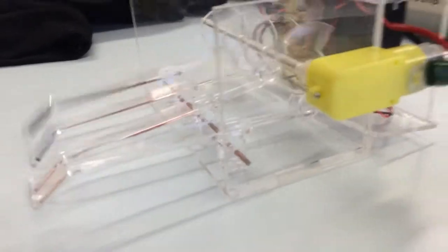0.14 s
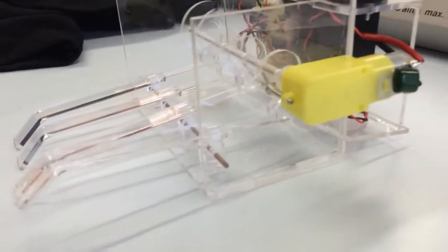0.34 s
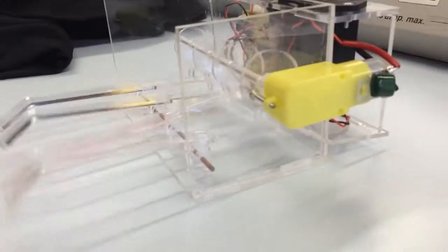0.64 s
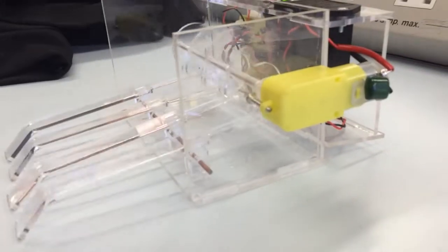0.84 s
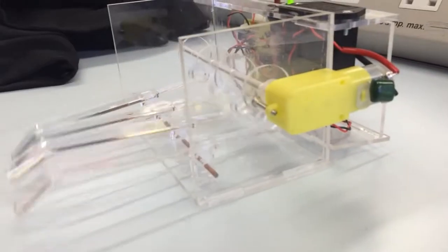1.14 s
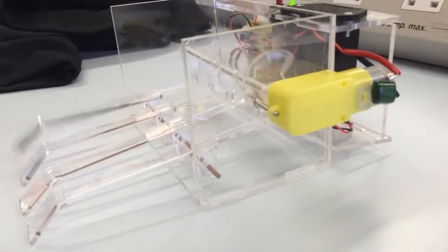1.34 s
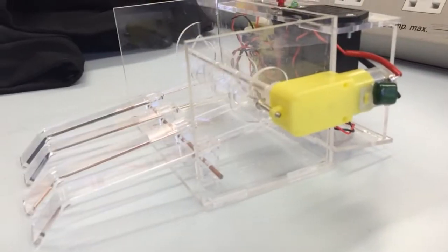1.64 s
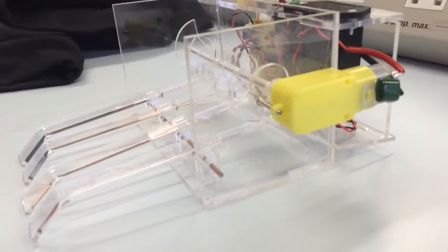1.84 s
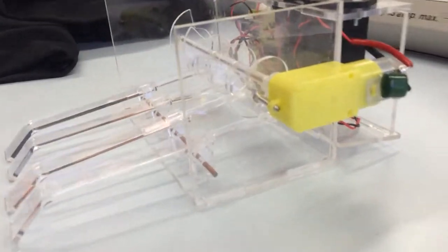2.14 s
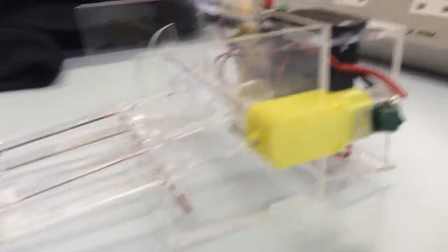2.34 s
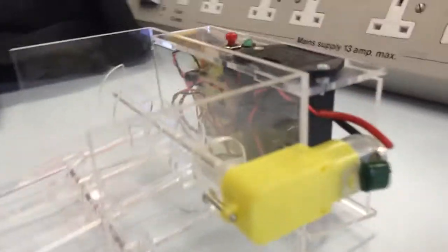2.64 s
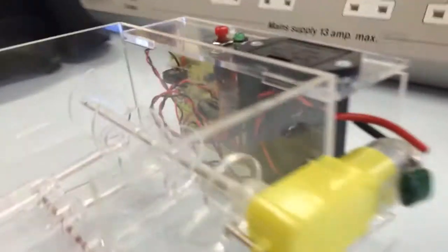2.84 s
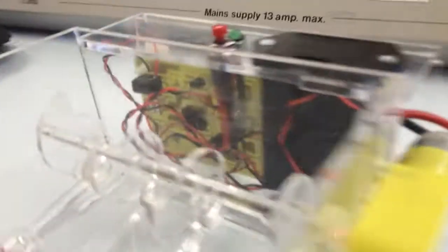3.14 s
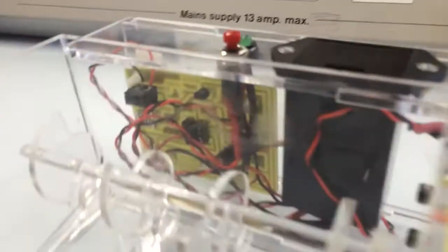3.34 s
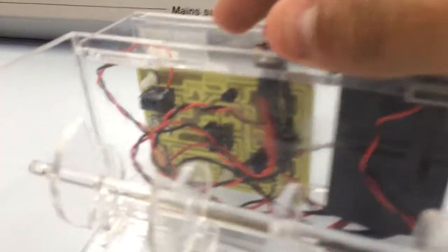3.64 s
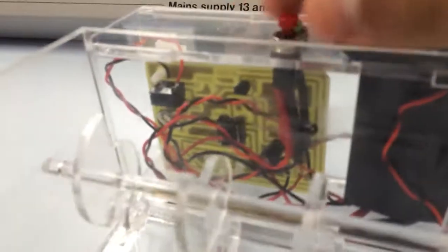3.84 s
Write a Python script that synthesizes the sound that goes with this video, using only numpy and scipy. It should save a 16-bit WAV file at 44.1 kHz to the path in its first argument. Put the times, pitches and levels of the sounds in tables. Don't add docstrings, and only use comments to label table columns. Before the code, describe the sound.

A small geared motor whirs with clacking plastic levers, winds down, then two table knocks

```python
import sys
import numpy as np
from scipy import signal
from scipy.io import wavfile

SR = 44100
rng = np.random.default_rng(int(sys.argv[2]) if len(sys.argv) > 2 else 0)


def dump(signal):
    limited = np.clip(np.atleast_2d(signal).T, -1, 1)
    pcm = np.round(limited * 32767).astype(np.int16)
    wavfile.write(sys.argv[1], SR, pcm)


def natural_amplitude(level_db):
    exponent = np.asarray(level_db, float) / 20
    return 10 ** exponent


N = 176400
T = np.arange(N) / SR


def rms_one(x):
    return x / np.sqrt(np.mean(x ** 2) + 1e-20)


def at_hz(points, hz):
    points = np.array(points)
    return np.interp(np.log(hz), np.log(points[:, 0]), points[:, 1])


def drift(rate):
    r = np.exp(-80 * np.pi * rate / SR)
    chance = rng.standard_normal(N // 40 + 2002)
    slow = signal.lfilter([1], [1, -2 * r, r * r], chance)[2000:]
    return np.interp(np.arange(N) / 40, np.arange(len(slow)), rms_one(slow))


def ring(x, hz, t60):
    r, w = natural_amplitude(-60 / (t60 * SR)), 2 * np.pi * hz / SR
    return signal.lfilter([0, np.sin(w)], [1, -2 * r * np.cos(w), r * r], x + 1e-18)


def butter(x, order, hz, kind):
    return signal.sosfilt(signal.butter(order, hz, kind, fs=SR, output="sos"), x)


def peak(x, hz, width_hz):
    return signal.lfilter(*signal.iirpeak(hz, hz / width_hz, SR), x)


def bands(x, spectrum, shape):
    edges = 25 * 2 ** np.arange(0, 9.7, .5)
    out, power = 0, 0
    for k, (low, high) in enumerate(zip(edges, edges[1:])):
        hz = np.sqrt(low * high)
        gain = natural_amplitude(at_hz(spectrum, hz))
        power += gain ** 2 * (high - low) * 2 / SR
        out = out + gain * shape(hz) * butter(x[k % 2], 2, [low, high], "band")
    return out / np.sqrt(power)


def strike(t, rise_s, t60):
    return np.clip(t / rise_s, 0, 1) * natural_amplitude(-60 * np.clip(t - rise_s, 0, None) / t60)


def puff(t, length_s):
    return np.exp(-.5 * (t / length_s) ** 2)


# f/Hz, level/dB per Hz
HUM = [(15, -47), (25, -14), (227, -3), (289, -21), (322, -13), (445, -14.5), (537, -17.5), (6050, -38),
       (15500, -43)]
# f/Hz, width/Hz, level/dB
HUM_TONES = [(125, 9.3, -56.5), (223.3, 8.5, -55), (324, 14, -64.5), (173, 4, -63.5)]
HUM_DB = -52


def room():
    air = bands(rng.standard_normal((2, N)), HUM, lambda hz: natural_amplitude(1.2 * drift(1.3)))
    out = natural_amplitude(HUM_DB - 3.5) * air
    for hz, width_hz, db in HUM_TONES:
        out = out + natural_amplitude(db) * rms_one(peak(rng.standard_normal(N), hz, width_hz))
    return out


# t/s, level/dB, f/Hz, t60/s
TICKS = [(.315, -36.5, 590, 0.18), (0.441, -32, 318, 0.18), (1.436, -36.5, 404, 0.16),
         (1.569, -35.5, 195.5, 0.19), (2.09, -51.5, 510, 0.11), (2.133, -53, 6100, 0.072),
         (3.1, -26.5, 197, 0.5), (2.59, -47.5, 537, 0.073), (2.589, -44, 180, 0.13), (3.26, -47, 792, 0.21),
         (3.926, -57.5, 1230, 0.046)]
TICK_CRACK_DB = -9


def far_ticks():
    wobble = drift(32)
    bright = signal.lfilter([1, -.7], [1], rng.standard_normal(N))
    out = np.zeros(N)
    for s, db, hz, t60 in TICKS:
        t = T - s
        out += natural_amplitude(db) * strike(t, 0.1 * t60, t60) * np.sin(2 * np.pi * hz * t + .7 * wobble)
        if hz > 1000:
            out += natural_amplitude(db + TICK_CRACK_DB) * strike(t, .001, .02) * bright
    return out


# t/s, length/s, level/dB
RUSTLES = [
    (2.89, .03, -59),
    (3.73, .02, -63),
    (3.928, .0025, -53),
    (3.91, .03, -66),
    (3.33, .01, -50),
    (2.14, .012, -62),
    (2.593, .004, -58),
]


def cloth():
    dull = signal.lfilter([.6], [1, -.7], rng.standard_normal(N))
    return sum(natural_amplitude(db) * puff(T - s, length_s) for s, length_s, db in RUSTLES) * dull


# t/s, level/dB, f/Hz
BUMPS = [
    (.19, -34, 79),
    (.207, -25, 173),
    (0.195, -28.5, 59.7),
    (0.241, -28.5, 240),
    (0.25, -30.5, 134),
    (.255, -38, 45),
    (.3, -36.5, 136),
    (.87, -31.5, 125),
    (3.39, -38, 84),
    (0.488, -38, 220),
]
BUMP_CYCLES = 7.5
RUMBLE_S, RUMBLE_LENGTH_S, RUMBLE_DB, RUMBLE_HZ = 0.37, 0.18, -45.5, 315


def grip():
    rumble = rms_one(butter(rng.standard_normal(N), 2, [40, RUMBLE_HZ], "band"))
    out = natural_amplitude(RUMBLE_DB) * puff(T - RUMBLE_S, RUMBLE_LENGTH_S) * rumble
    for s, db, hz in BUMPS:
        out += natural_amplitude(db) * strike(T - s, 1.7 / hz, BUMP_CYCLES / hz) * np.sin(2 * np.pi * hz * (T - s))
    return out


# t/s, length/s, level/dB, f/Hz
SWELLS = [(0.06, 0.013, -37, 1470), (0.558, 0.017, -38, 2050), (0.567, 0.012, -38.5, 1210),
          (.625, .015, -39, 2340), (.67, .015, -51, 2120), (1.25, .02, -36.5, 2270),
          (1.535, .012, -46, 1260), (1.585, .01, -42.5, 1880), (1.59, .015, -47.5, 920),
          (1.687, 0.025, -49.5, 960), (1.713, 0.011, -61, 2200), (1.732, 0.022, -57, 1300),
          (1.79, .025, -62, 1320), (2.094, .01, -66, 1680), (2.269, 0.0055, -72, 6120),
          (2.87, 0.023, -64, 1710), (2.874, 0.0055, -66.5, 5830), (2.92, .01, -64, 1800),
          (3.298, 0.015, -51, 780), (3.72, .015, -65.5, 12960), (.37, 0.021, -44.5, 200)]
SWELL_WIDTH_HZ = 120


def brushed_parts():
    white, out = rng.standard_normal(N), np.zeros(N)
    for s, length_s, db, hz in SWELLS:
        span = slice(max(int((s - .1) * SR), 0), int((s + .1) * SR))
        narrow = rms_one(peak(white[span], hz, SWELL_WIDTH_HZ))
        out[span] += natural_amplitude(db) * puff(T[span] - s, length_s) * narrow
    return out


# t/s, peak level/dB, f/Hz,
# t60/s
PINGS = [(3.047, -26, 1260, .05), (3.058, -30, 1650, .04), (3.064, -18, 300, .05), (3.083, -27, 5750, .05),
         (3.087, -19, 3500, .04), (3.089, -13, 1570, .05), (3.093, -23, 300, .08), (3.107, -25, 3590, .035),
         (3.121, -29, 1610, .06), (3.13, -29, 3340, .04), (3.147, -36, 3340, .04), (3.165, -38, 1610, .1),
         (3.18, -39, 740, .08), (3.325, -42, 1230, .06), (3.347, -19, 740, .06), (3.348, -27, 2350, .05),
         (3.352, -15, 1590, .035), (3.361, -25, 3020, .04), (3.362, -27, 657, .12), (3.376, -30, 5600, .04),
         (3.926, -56, 1900, .04), (3.926, -56, 2900, .04), (3.926, -58, 5600, .03), (3.365, -28, 200, .16)]


def struck_parts():
    out = np.zeros(N)
    for s, db, hz, t60 in PINGS:
        out += natural_amplitude(db) * strike(T - s, 1.5 / hz, t60) * np.sin(2 * np.pi * hz * (T - s))
    return out


# t/s, level/dB, rise/s, brightness/dB per
# octave, boom level/dB
KNOCKS = [(3.044, -26, 0.0047, -7.5, -26), (3.063, -41.5, 0.0028, 1.5, -15.5),
          (3.082, -31, 0.00061, 3.4, -15), (3.086, -26, 0.0028, 0.6, -24), (3.105, -66, 0.0026, -3.2, -34),
          (3.23, -51, 0.039, -4.5, -63), (3.311, -43.5, .003, -1.5, -57), (3.344, -23, 0.011, -4, -23.5),
          (3.357, -36, 0.0086, 1.5, -25), (3.37, -45, 0.0037, 8, -37), (3.485, -57, 0.0076, 1, -50)]
# f/Hz, level/dB per Hz
KNOCK = [(240, -21.5), (400, -11), (1080, -9.5), (1560, -2.5), (2290, -4), (3620, -5.5), (3970, -9.5),
         (7790, -14.5), (15500, -32.5)]
# f/Hz, t60/s
KNOCK_T60 = [(100, 0.24), (260, 0.45), (700, 0.32), (1840, 0.21), (4850, 0.17), (12800, 0.17)]
# f/Hz, level/dB, t60/s
TABLE = [(197, 5, 0.31), (251.6, 0.5, 0.17), (291, -1, 0.37), (411, -14, 0.086)]
# f/Hz, level/dB, t60/s
BOX = [(743, 0, 0.087), (1576, 1.5, 0.078), (2400, -12, .05), (3440, -7, .03), (6200, -15, .12),
       (7600, -2, .03)]
BOX_DB = -32


def knocks():
    def contact(hz, t60):
        return sum(natural_amplitude(db + tilt * np.log2(hz / 1500)) * strike(T - s, rise_s, t60)
                   for s, db, rise_s, tilt, _ in KNOCKS)

    white = rng.standard_normal((2, N))
    out = bands(white, KNOCK, lambda hz: contact(hz, at_hz(KNOCK_T60, hz)))
    for hz, db, t60 in BOX:
        out = out + natural_amplitude(BOX_DB + db) * ring(contact(hz, 0.084) * white[0], hz, t60)
    push = sum(natural_amplitude(boom_db) * strike(T - s, .002, .012) for s, _, _, _, boom_db in KNOCKS) / 100
    push = butter(push, 2, 90, "high")
    for hz, db, t60 in TABLE:
        out = out + natural_amplitude(db) * ring(push, hz, t60)
    return butter(out, 4, 95, "high")


# t/s, peak level/dB, low ring f/Hz, high ring f/Hz
CLACKS = [(0.144, -7.5, 997, 10230), (0.1747, -17, 780, 3400), (0.2006, -12, 980, 2740),
          (0.2513, -9.5, 1825, 2930), (0.7136, -16, 855, 2330), (0.749, -10.5, 990, 9850),
          (0.777, -19.5, 2000, 6870), (0.804, -10.5, 857, 7500), (0.8503, -7.5, 853, 2830),
          (1.2888, -10, 1900, 6480), (1.3532, -10.5, 1040, 7000), (1.3827, -21.5, 1930, 1980),
          (1.41, -11, 1790, 7600), (1.46, -10.5, 910, 6730)]
# f/Hz, level/dB per Hz
CLACK = [(180, -43), (300, -17.5), (892, -8.5), (1800, -6.5), (2880, -6), (4100, -6), (12400, -6.5),
         (15200, -9.5), (16500, -42)]
# f/Hz, level/dB, t60/s
LEVER = [(697, -27.5, 0.044), (3010, -8, .025), (3910, -12.5, .02), (6680, -2.5, .02), (7730, -4, .02),
         (10100, -4.5, .015)]
GRAZES_S = [
    .175,
    .777,
    1.383,
]
GRAZE_CUT_HZ = 7000
DOUBLE_S, DOUBLE_GAP_S = .8495, .0045
CLACK_DB, CLACK_T60_S, RATTLE_S = -6, 0.012, 0.0033
LEVER_DB, RING_DB, LOW_RING_DB, LOW_RING_T60_S = -32, -27, -36.5, 0.038


def levers():
    noise = bands(rng.standard_normal((2, N)), CLACK, lambda hz: 1)
    dull = butter(noise, 4, GRAZE_CUT_HZ, "low")
    white, out = rng.standard_normal(N), np.zeros(N)
    spread_db = rng.normal(0, 2.8, (len(CLACKS), len(LEVER)))
    for (s, db, low_hz, high_hz), own_db in zip(CLACKS, spread_db):
        span = slice(int(s * SR) - 20, int(s * SR) + 4400)
        t = T[span] - s + .0003
        grazes = min(abs(s - g) for g in GRAZES_S) < .01
        length_s = RATTLE_S + DOUBLE_GAP_S * (abs(s - DOUBLE_S) < .01)
        fall_db = -60 * np.clip(t - length_s, 0, None) / CLACK_T60_S - 510 * np.clip(t, 0, length_s)
        touch = natural_amplitude(db) * np.clip(t / 0.0002, 0, 1) * natural_amplitude(fall_db)
        hit = touch * white[span]
        out[span] += natural_amplitude(CLACK_DB) * touch * (dull if grazes else noise)[span]
        out[span] += natural_amplitude(RING_DB) * ring(hit, high_hz, .015)
        out[span] += natural_amplitude(LOW_RING_DB) * ring(hit, low_hz, LOW_RING_T60_S)
        for (hz, mode_db, t60), gain_db in zip(LEVER, own_db):
            if not grazes or hz < GRAZE_CUT_HZ:
                out[span] += natural_amplitude(LEVER_DB + mode_db + gain_db) * ring(hit, hz, t60)
    return butter(out, 2, 350, "high")


SHAFT_HZ, SHAFT_CREEP_HZ_PER_S, CAM_TURN_S = 211.89, .10, .6097
TWICE_HZ, TWICE_PEAK_S, ONCE_HZ, ONCE_PEAK_S = 5.22, .3467, 1.32, .2726
CUT_S, COAST_S, REST_S = 1.506, .48, 1.83


def shaft():
    twice = 4 * np.pi * (T - TWICE_PEAK_S) / CAM_TURN_S
    once = 2 * np.pi * (T - ONCE_PEAK_S) / CAM_TURN_S
    hz = SHAFT_HZ + SHAFT_CREEP_HZ_PER_S * T + TWICE_HZ * np.cos(twice) + ONCE_HZ * np.cos(once)
    coast = np.clip(T - CUT_S, 0, None)
    slowing_hz = np.interp(CUT_S, T, hz) * np.clip(1 - coast / COAST_S, 0, 1)
    return np.where(T < CUT_S, hz, slowing_hz), coast, twice


# multiples of the shaft f, and their level/dB rms
LOW_ORDERS = [1, 3, 4, 5, 6, 9, 10, 11, 13, 14, 15, 16, 16.6, 24, 25, 26, 33]
LOW_DB = [-51, -57, -46, -50, -50, -50, -47, -48, -55, -58, -57, -51, -56, -57, -55, -57, -55]
# multiples of the shaft f, and their level/dB rms
HIGH_ORDERS = [47, 48, 49, 51, 54, 55, 56, 57, 63, 64, 67, 68, 69, 70, 71, 75, 78, 81, 85]
HIGH_DB = [-66, -52, -64, -64, -61, -56, -58, -62, -62, -61, -63, -64, -58, -53, -48, -45, -44, -45, -46]
MESH_ORDERS = (16, 16.6)
MESH_FADE_SHARE = .25
LOW_WAVER_DB, HIGH_WAVER_DB = 3.6, 2.5
LOW_SONG_FADE_DB_PER_S, HIGH_SONG_FADE_DB_PER_S = 200, 170
FIFTH_SURGE_DB = 9
TOP_EASE_HZ, TOP_EASE_DB_PER_KHZ = 14800, 11
BLUR_TURNS = .0005


def whine(hz, coast, twice, turns):
    blurred, sing = turns + BLUR_TURNS * drift(40), 0
    groups = ((LOW_ORDERS, LOW_DB, LOW_WAVER_DB, LOW_SONG_FADE_DB_PER_S),
              (HIGH_ORDERS, HIGH_DB, HIGH_WAVER_DB, HIGH_SONG_FADE_DB_PER_S))
    for orders, levels, waver_db, fade in groups:
        for k, db in zip(orders, levels):
            surge_db = FIFTH_SURGE_DB * (np.cos(twice + .7) - .2) * (k == 5)
            above_khz = np.clip(k * hz - TOP_EASE_HZ, 0, None) / 1000
            ease_db = TOP_EASE_DB_PER_KHZ * above_khz * (T < CUT_S)
            fade_share = .6 if k > 72 else MESH_FADE_SHARE if k in MESH_ORDERS else 1
            level_db = db + 3 + surge_db - ease_db + waver_db * drift(12) - fade * coast * fade_share
            sing = sing + natural_amplitude(level_db) * np.sin(2 * np.pi * (k * blurred + rng.random()))
    return sing


# f/Hz, level/dB per Hz
GEARS = [(150, -27.5), (300, -14.5), (500, -12.5), (1000, -3), (2200, -5.5), (5200, -3), (8500, -10),
         (12000, -12.5), (15500, -13)]
# f/Hz, width/Hz, level/dB
FRAME = [(1300, 82, -2.5), (2050, 350, 2.5), (3370, 330, -3.5), (4590, 250, -2), (7000, 200, -4),
         (11800, 290, -2)]
EFFORT_DB, EFFORT_SWING_DB, EFFORT_PEAK_S, TREBLE_SWING_SHARE = -31.5, 2, 0.068, 0.5
TOOTH_SHARE, TEETH_PER_S, GEAR_PATCH_DB = 0.3, 2500, 1.3
WHEEL_SHARE = .1
COAST_DB_PER_S, MIDDLE_COAST_SHARE, TREBLE_COAST_SHARE = 62, 1.46, .18


def gear_rattle(coast, turns):
    teeth = (rng.random((2, N)) < TEETH_PER_S / SR) * rng.standard_normal((2, N))
    friction = rng.standard_normal((2, N))
    grit = np.sqrt(TOOTH_SHARE) * rms_one(teeth) + np.sqrt(1 - TOOTH_SHARE) * friction
    around = np.linspace(0, 1, 220)
    wheel = np.array([np.interp(turns % 1, around, w) for w in rng.standard_normal((2, 220))])
    wheel = rms_one(wheel) * natural_amplitude(-LOW_SONG_FADE_DB_PER_S * coast)
    grit = np.sqrt(1 - WHEEL_SHARE * (T < CUT_S)) * grit + np.sqrt(WHEEL_SHARE) * wheel
    shared = drift(10)
    swing_db = EFFORT_SWING_DB * np.cos(2 * np.pi * (T - EFFORT_PEAK_S) / CAM_TURN_S)
    coast_db = COAST_DB_PER_S * coast * np.sqrt(coast / (REST_S - CUT_S))

    def effort(hz):
        patch_db = GEAR_PATCH_DB * (0.34 * shared + drift(25))
        swing_share = TREBLE_SWING_SHARE if hz > 8e3 else 1
        coast_share = TREBLE_COAST_SHARE if hz > 11e3 else MIDDLE_COAST_SHARE if hz > 3e3 else 1
        return natural_amplitude(patch_db + swing_db * swing_share - coast_db * coast_share)

    rattle = bands(grit, GEARS, effort)
    body = rattle.copy()
    for hz, width_hz, db in FRAME:
        body += natural_amplitude(db) * peak(rattle, hz, width_hz)
    return natural_amplitude(EFFORT_DB - 4) * body


def motor():
    hz, coast, twice = shaft()
    turns = np.cumsum(hz) / SR
    running = whine(hz, coast, twice, turns) + gear_rattle(coast, turns)
    return running * np.clip((REST_S - T) / .09, 0, 1)


CUTOFF_HZ, CLACK_TOP_LEAK_DB = 15280, -15


def cut_top(x):
    return signal.sosfilt(signal.ellip(10, .5, 60, CUTOFF_HZ, fs=SR, output="sos"), x)


def scene():
    quiet = room() + far_ticks() + cloth() + grip() + brushed_parts()
    clacks = levers()
    leak = signal.sosfilt(signal.cheby2(10, 60, 16700, fs=SR, output="sos"), clacks - cut_top(clacks))
    leak = butter(natural_amplitude(CLACK_TOP_LEAK_DB) * leak, 8, CUTOFF_HZ, "high")
    return np.tile(cut_top(quiet + struck_parts() + knocks() + clacks + motor()) + leak, (2, 1))


def roll_off(x):
    return signal.sosfilt(signal.butter(12, 16640, fs=SR, output="sos"), x)


def record(dry):
    return roll_off(dry)


dry = scene()
out = record(dry)
dump(out)
```